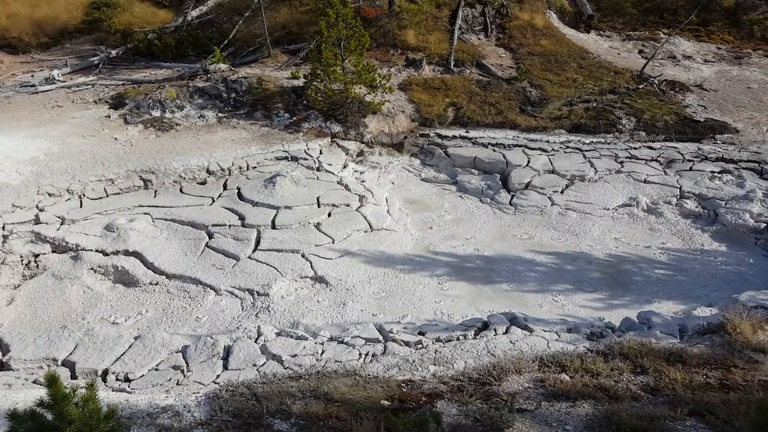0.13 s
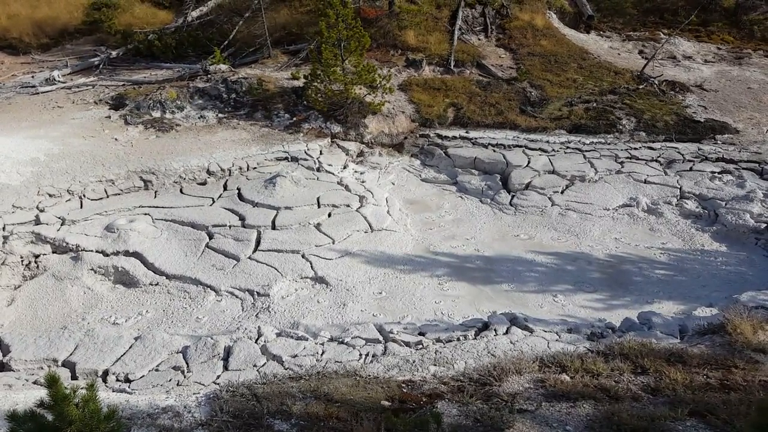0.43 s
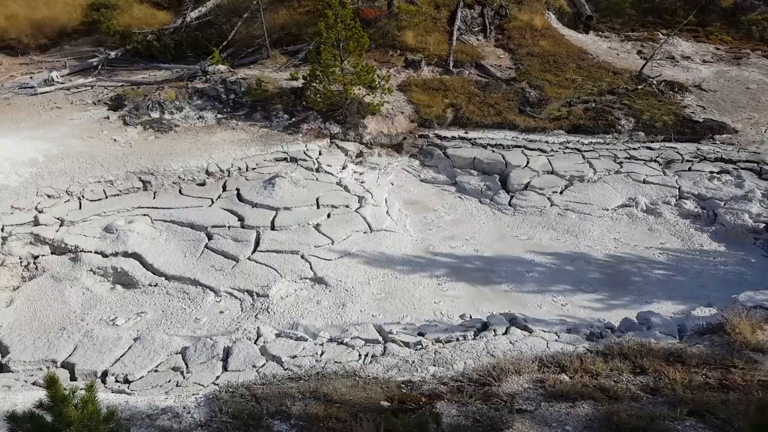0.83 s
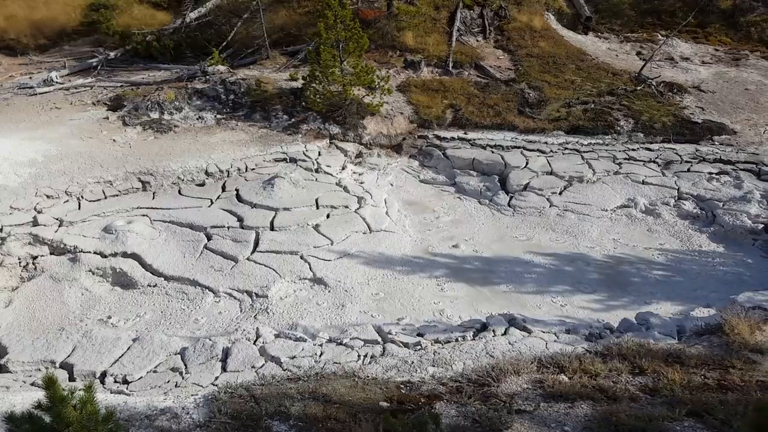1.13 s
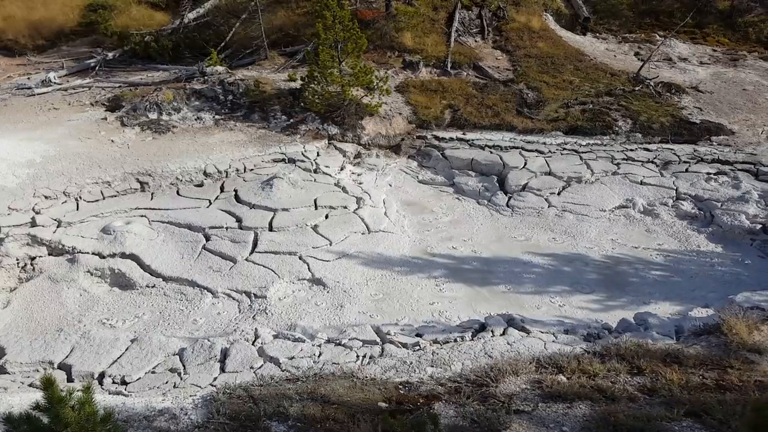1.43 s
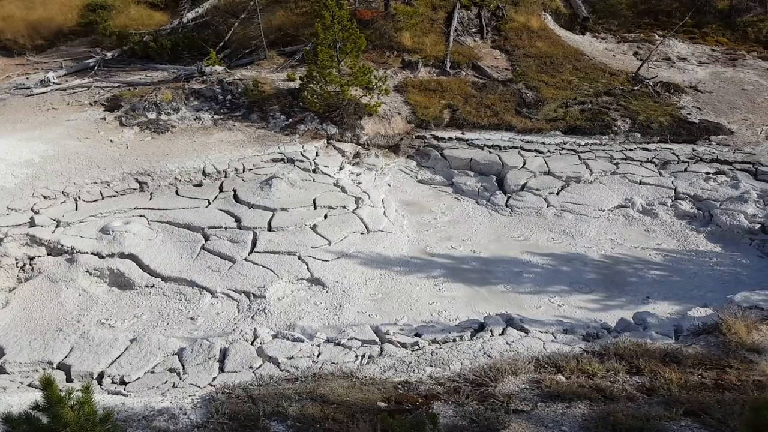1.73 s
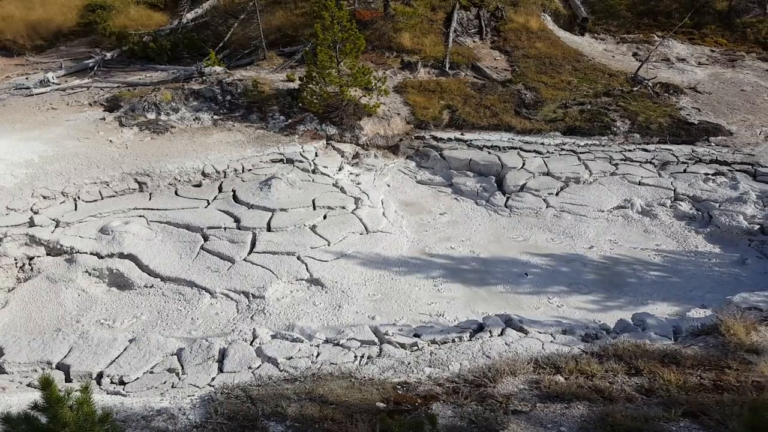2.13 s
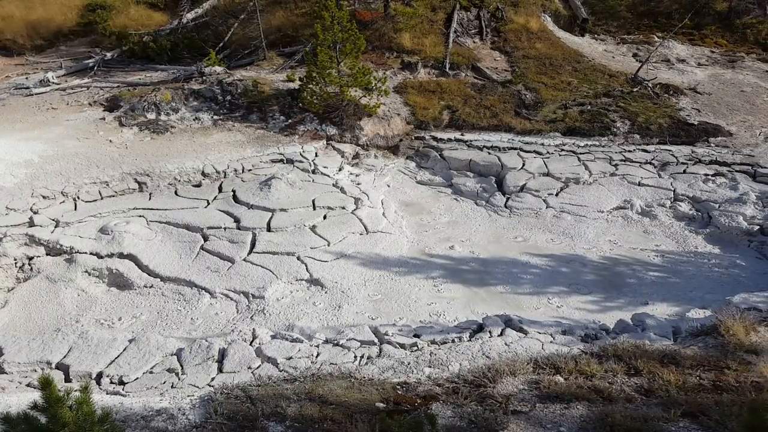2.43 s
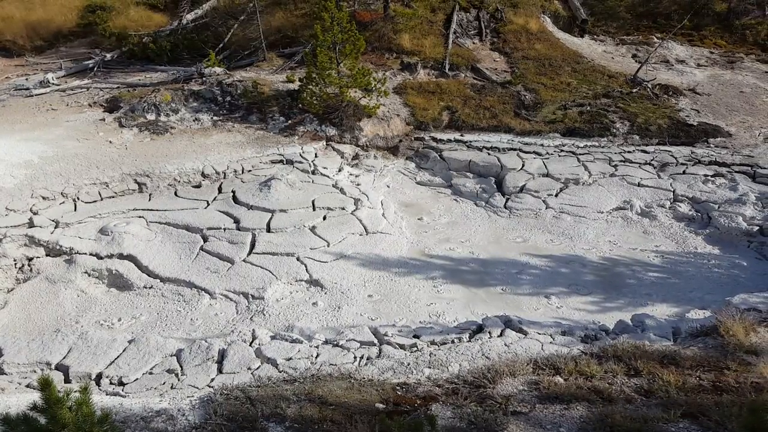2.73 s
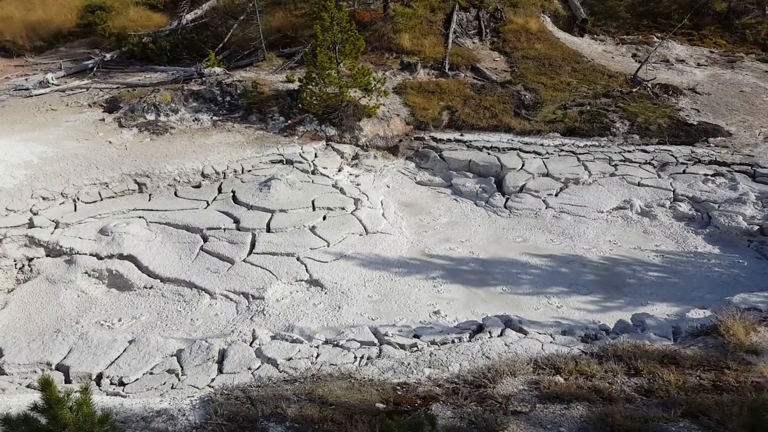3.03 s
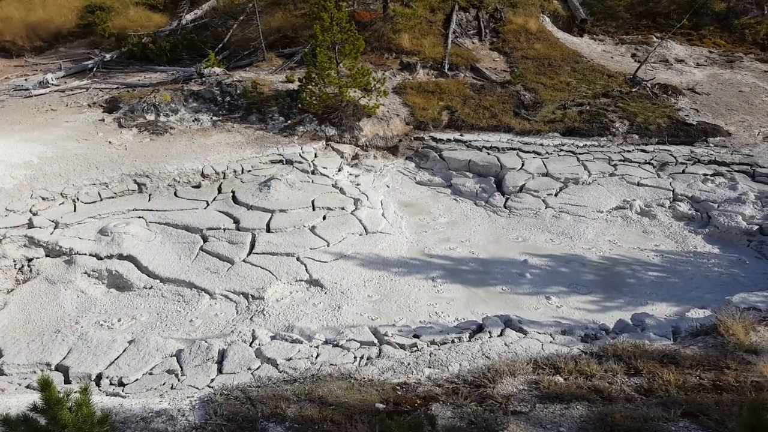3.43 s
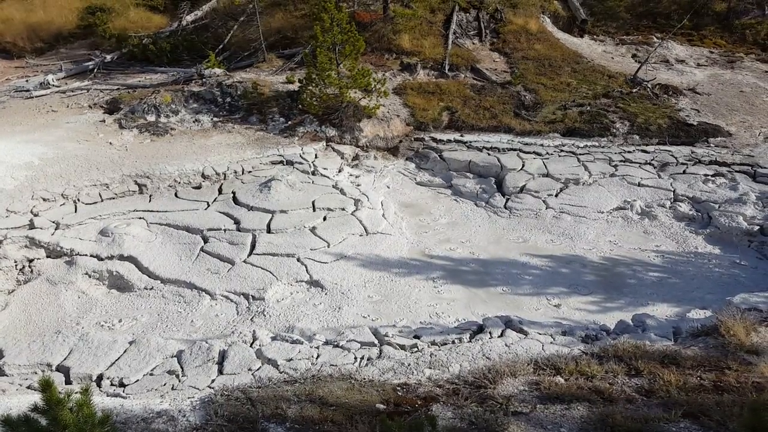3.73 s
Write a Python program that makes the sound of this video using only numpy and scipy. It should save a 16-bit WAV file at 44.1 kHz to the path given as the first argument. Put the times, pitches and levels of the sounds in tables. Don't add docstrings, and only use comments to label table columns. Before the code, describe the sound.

Thick mud bubbles and plops in irregular clusters some metres from a small stereo camera outdoors; gas spits and left-sided wind knocks come early, a sharp wet snap past the middle, soft steam hiss throughout.

```python
import sys
import numpy as np
from scipy import signal
from scipy.fft import rfft, irfft
from scipy.io import wavfile
from scipy.ndimage import uniform_filter1d, map_coordinates

SR = 44100
rng = np.random.default_rng(int(sys.argv[2]) if len(sys.argv) > 2 else 0)


def gain_from_db(level_db):
    decades = np.asarray(level_db, float) / 20
    return 10 ** decades


def digitize_waveform(pressure):
    field = np.atleast_2d(pressure).T
    bounded = np.clip(field, -1, 1)
    quanta = np.round(bounded * 32767).astype(np.int16)
    wavfile.write(sys.argv[1], SR, quanta)


N = 171990
T = np.arange(N) / SR


def level(x, db):
    return x * gain_from_db(db) / np.sqrt(np.mean(x ** 2))


def colour(x, points, rings=()):
    f = np.maximum(np.fft.rfftfreq(4096, 1 / SR), 5)
    hz, db = np.array(points).T
    curve = np.interp(np.log(f), np.log(hz), db)
    for centre, width, gain in rings:
        curve = curve + gain / (1 + ((f - centre) / width) ** 2)
    cepstrum = irfft(curve * np.log(10) / 20)
    cepstrum[1:2048] *= 2
    cepstrum[2049:] = 0
    return signal.fftconvolve(x, irfft(np.exp(rfft(cepstrum))))[:N]


def walk(rate):
    hold = int(SR / rate)
    steps = np.repeat(rng.standard_normal(N // hold + 1), hold)
    return 1.67 * uniform_filter1d(uniform_filter1d(steps, hold), hold)[:N]


def swell(start, length, lean):
    return np.sin(np.pi * np.clip((T - start) / length, 0, 1) ** lean)


# [f/Hz, level/dB]
CIRCUIT_COLOUR = [(100, -23), (5000, -30), (9500, -21), (12000, 13.5), (15500, 14.5)]
CIRCUIT_DB = (-68.5, -77)


def circuit_noise():
    return np.array([level(colour(rng.standard_normal(N), CIRCUIT_COLOUR), db) for db in CIRCUIT_DB])


# [f/Hz, level/dB]
WIND_COLOUR = [(20, -10), (40, -2), (62, 1.5), (110, -7), (200, -26), (400, -48)]
# [t/s, level/dB]
WIND_COURSE = [(0, -48), (.9, -57), (1.5, -63), (2.2, -61.5), (2.9, -65), (3.4, -59), (3.9, -65)]
# [t/s, length/s, level/dB, f/Hz]
WIND_KNOCKS = [
    (.0, 0.08, -37, 77),
    (0.053, 0.048, -28.5, 61),
    (0.136, 0.041, -33, 87.5),
    (0.317, 0.065, -42, 51),
    (0.593, 0.028, -33, 57),
    (0.66, 0.093, -41, 80.6),
    (0.784, 0.032, -35.5, 83.6),
    (1.353, 0.078, -27, 72),
    (1.757, 0.032, -38, 86),
    (3.47, .07, -45.5, 68.4),
]


def wind():
    course_db = np.interp(T, *np.array(WIND_COURSE).T)
    rumble = []
    for port_db in (0, -4.5):
        noise = level(colour(rng.standard_normal(N), WIND_COLOUR), port_db)
        rumble.append(noise * gain_from_db(course_db + 0.73 * walk(17)))
    knocks = np.zeros(N)
    for s, length, db, hz in WIND_KNOCKS:
        wobbly = np.sin(2 * np.pi * hz * (T - s) + walk(70))
        knocks += gain_from_db(db) * swell(s, length, 0.9) * wobbly
    return np.array(rumble) + knocks * gain_from_db(np.array([[0], [-17]]))


# [t/s, level/dB, left minus right level/dB]
NEAR_TICKS = [
    (0.2991, -50, 13),
    (1.5293, -52, 12),
    (1.7703, -48, 15),
    (2.4803, -43, 6.0),
]


def ticks():
    out = np.zeros((2, N))
    age = np.arange(200)
    for s, db, pan in NEAR_TICKS:
        click = np.diff(rng.standard_normal(200) * np.exp(-age / 22), prepend=0)
        i = int(s * SR)
        out[:, i:i + 200] += click * gain_from_db(db - 6 + np.array([[pan], [-pan]]) / 2)
    return out


def tap():
    fade_s, ring_hz = 0.0004, 15300
    age = np.maximum(T - 3.5839, 0)
    dent = np.exp(-age / fade_s) * (1 - np.exp(-(age / 0.00012) ** 2))
    rebound = 0.2 * np.sin(np.minimum(age / 0.005, 1) * np.pi)
    ring = 0.75 * age / fade_s * np.exp(-2 * age / fade_s) * np.sin(2 * np.pi * ring_hz * age)
    return -gain_from_db(-16) * (dent - rebound + ring) * np.array([[0], [1]])


# [f/Hz, level/dB]
STEAM_COLOUR = [(40, -7.5), (120, 8.5), (400, 10.5), (800, 3), (1500, -0.5), (3000, -11), (5000, -11.5),
                (9000, -27.5)]
# [f/Hz, level/dB]
SCATTER_COLOUR = [(150, 4.5), (600, -12), (1500, 1.5), (3000, 9.5), (10000, 8)]


def steam():
    hiss = []
    for _ in range(3):
        flicker_db = 1.12 * walk(24.863) + 0.097 * walk(2.26)
        hiss.append(colour(rng.standard_normal(N) * gain_from_db(flicker_db), STEAM_COLOUR))
    gain = gain_from_db(-52) / np.std(hiss[0])
    scattered = [gain * gain_from_db(-1.5) * colour(h, SCATTER_COLOUR) for h in hiss[1:]]
    return gain * hiss[0], scattered


# [t/s, length/s, bubble level/dB, middle f/Hz, gas level/dB]
MUD_CHURNS = [(0.077, 0.046, -39.5, 568, -42.5), (0.431, 0.087, -44.5, 310, -52),
              (0.533, 0.036, -47, 320, -52), (0.612, 0.061, -38.5, 331, -41.5),
              (0.921, 0.072, -45, 325, -50.5), (1.124, 0.051, -46.5, 402, -44),
              (1.31, 0.058, -47, 305, -60), (1.359, 0.062, -51, 286, -47.5), (1.495, 0.1, -43.5, 425, -58),
              (1.68, 0.058, -39.5, 332, -46), (1.734, 0.079, -40, 298, -47.5),
              (1.8, 0.048, -49.5, 300, -53), (0.874, .06, -45.5, 250, -57.5),
              (3.265, 0.039, -50.5, 330, -66), (2.131, 0.1, -41, 364, -46), (2.32, 0.048, -38, 574, -41),
              (2.473, 0.077, -50, 350, -56), (2.653, 0.039, -44, 402, -57), (2.729, 0.06, -46.5, 338, -53),
              (3.102, 0.1, -41, 284, -44), (3.206, 0.069, -43, 394, -46.5), (3.317, 0.16, -51, 312, -73),
              (3.586, 0.11, -41.5, 398, -48.5), (3.686, 0.099, -43, 236, -52)]
# [t/s, peak level/dB, rise/s]
GAS_SPITS = [
    (0.012, -23.5, 0.0021),
    (0.29, -22, 0.0017),
    (.832, -30, 0.0025),
    (1.768, -32.5, 0.0026),
    (1.554, -23.5, 0.0032),
    (2.36, -29.5, 0.0022),
    (3.645, -25.5, 0.0044),
    (2.661, -30, 0.0029),
]
# [f/Hz, level/dB]
GAS_COLOUR = [(100, 16), (400, 6.5), (800, 4), (1400, -0.5), (2500, -6), (4500, -10), (8000, -29.5),
              (16000, -41)]


def gas():
    puffs = np.zeros(N)
    for s, length, _, _, gas_db in MUD_CHURNS:
        puffs += gain_from_db(gas_db) * swell(s, 1.187 * length, 0.95)
    puffs *= gain_from_db(4.5 * walk(300))
    spits = np.zeros(N)
    for s, db, rise in GAS_SPITS:
        age = np.maximum(T - s, 0) / max(rise, 0.0005)
        spits += gain_from_db(db - 9) * age * np.exp(1 - age)
    return (puffs + spits) * level(colour(rng.standard_normal(N), GAS_COLOUR), 0)


def add_bubble(out, s, db, hz, cycles):
    hook, hook_cycles, top = 0.5, 1.52, 1.141
    u = np.arange(int(7 * cycles / hz * SR)) * hz / SR
    i = max(int(s * SR), 0)
    turns = top * u - hook * hook_cycles * (1 - np.exp(-u / hook_cycles))
    envelope = gain_from_db(db) * u / cycles * np.exp(1 - u / cycles)
    ring = envelope * np.sin(2 * np.pi * turns)
    out[i:i + len(u)] -= ring[:max(N - i, 0)]


def add_churn(out, s, length, db, hz, gas_db):
    n = min(int(380 * length), 60)
    for k, (jitter, pitch, size, spray) in enumerate(rng.random((n, 4))):
        when = (k + jitter) / n
        size_db = -3 * np.log(size + 0.062) - 1 - 9 * (2 * when - 1) ** 2
        octaves = 1.717 * (pitch - 0.5)
        add_bubble(out, s + when * length, db + size_db, hz * 2 ** octaves, 0.85 * (1 + pitch))
        spray_db = gas_db + size_db - 5 - 10 * spray
        add_bubble(out, s + when ** 0.5 * length, spray_db, 561 * 2 ** (2 * spray), 2.5)


# [t/s, peak level/dB, f/Hz, cycles]
LONE_BUBBLES = [(0.052, -33.5, 311.0, 1.87), (0.0617, -24.5, 240, 0.66), (0.5283, -29.5, 340, 1.24),
                (0.543, -33.2, 374, 1), (0.5811, -27, 203, 0.93), (0.619, -26, 392, 1.3),
                (0.6294, -36.5, 227.0, 1.5), (0.655, -33, 413, 1.1), (0.8692, -30, 522.0, 0.97),
                (0.9539, -30, 424.0, 0.78), (0.968, -35.5, 308, 0.9), (1.1134, -23, 332, 1),
                (1.1363, -31, 415, 1.5), (1.1507, -35, 524, 3.4), (1.3352, -33, 336, 2.0),
                (1.559, -29, 518, 1.06), (1.6634, -23, 343, 0.9), (1.6735, -25, 278, 0.55),
                (1.6985, -35.5, 522.0, 3), (1.7052, -34, 224, 1.2), (1.737, -35, 226, 2.4),
                (1.7528, -36, 433, 1.6), (1.7694, -35, 280.0, 0.7), (1.7823, -35, 343, 2.9),
                (2.1533, -35.6, 380, 2.0), (2.1768, -30, 348, 0.94), (2.267, -26.5, 205.0, 0.7),
                (2.3083, -33.5, 185.0, 3), (2.3193, -32.5, 248.5, 3), (2.3284, -30, 585, 0.54),
                (2.3391, -29.5, 724, 0.39), (2.6531, -31, 380.5, 1.9), (2.6644, -33.5, 388, 2.2),
                (2.7275, -34, 332, 1.76), (3.1203, -37, 311.0, 3.7), (3.1289, -30.3, 250, 1.17),
                (3.1442, -35, 229, 1.5), (3.2047, -27.5, 380, 0.74), (3.2155, -28, 349, 1.23),
                (3.2357, -30, 536, 0.59), (3.5786, -32.5, 306, 2.0), (3.6012, -30.5, 477, 1.7),
                (3.6301, -34, 382.0, 0.7), (3.6408, -35.5, 382.0, 2.6), (3.6513, -36, 514, 1.5),
                (3.6688, -29, 208, 0.9), (3.7063, -29, 191, 1.1), (3.7128, -36.4, 356, 1.7),
                (3.7559, -32, 256, 0.99),
                (.13, -41, 640, 3.8), (0.299, -35.5, 430, 1.4), (0.438, -34.5, 256, 0.81),
                 (0.72, -41.5, 1030, 2.1), (.815, -35.5, 740, 1.46), (1.998, -37, 397, 1.05),
                 (2.448, -35.5, 191, 0.65), (2.773, -45.5, 820, 5.6), (3.098, -35, 253, 0.82),
                 (3.381, -40, 195, 0.6), (3.721, -32, 220, 0.59), (1.789, -33, 227, .8),
                 (1.671, -47, 2230, 5), (1.725, -52, 1980, 4), (1.749, -48, 1970, 4)]
# [t/s, peak level/dB, f/Hz, cycles]
SKIN_SNAP = (2.3320, -17.5, 680, .42)
# [t/s, peak level/dB, f/Hz]
THROWN_DROPS = [(0.0072, -43.4, 935), (0.012, -41.5, 1500), (0.1017, -45, 980), (0.1068, -47, 919.0),
                (0.2908, -40.5, 2995), (0.9538, -38.5, 926), (0.9598, -47, 823), (0.9673, -42.5, 823),
                (1.5483, -42.5, 796), (1.5518, -48, 1020), (1.5569, -37.5, 2220), (1.5613, -39.5, 1255),
                (1.6995, -44, 1530), (1.758, -42, 930), (1.765, -44, 780), (1.77, -46, 1170),
                (1.778, -39, 813), (1.7901, -46, 1160), (2.027, -43, 1380), (2.1659, -40, 900),
                (2.1884, -42.5, 1144), (2.196, -41, 857.0), (2.3232, -40, 1040), (2.3433, -39, 895),
                (2.3521, -46, 810), (3.1312, -41, 883), (3.1411, -41, 1056.0), (3.151, -47, 1190),
                (3.158, -41, 1310), (3.163, -43, 1230), (3.169, -40, 1213.0), (3.1773, -39, 919.0),
                (3.185, -52, 1200), (3.2426, -39, 3400), (3.251, -39, 786), (3.6268, -43.5, 2190),
                (3.642, -46.5, 1220), (3.6477, -40, 2280), (3.655, -39, 1700), (3.661, -44.9, 1100)]


def bubbles():
    out = np.zeros(N)
    for row in LONE_BUBBLES + [SKIN_SNAP]:
        add_bubble(out, *row)
    for drop in THROWN_DROPS:
        add_bubble(out, *drop, 2.7)
    for churn in MUD_CHURNS:
        add_churn(out, *churn)
    for when, pitch, size in rng.random((700, 3)):
        db = -57.5 - 12 * pitch - 7.5 * np.log(size + 0.044)
        add_bubble(out, when * N / SR, db, 110 * 2 ** (3.33 * pitch), 0.8)
    return out


def bank_echo(mud):
    age = np.arange(4000) / SR
    tail = rng.standard_normal(len(age)) * np.exp(-age / 0.0096) * (age > 0.003)
    bright = np.diff(mud, prepend=0) * 6
    return signal.fftconvolve(bright, tail / np.linalg.norm(tail))[:N] * gain_from_db(-14.5)


# [f/Hz, level/dB]
LEFT_COLOUR = [(100, -4.5), (350, -3.5), (520, -8.5), (750, 1.5), (1400, -2), (2500, -3.5), (5000, -9),
               (10000, -7.5)]
RIGHT_COLOUR = [(150, -5), (1000, -2.5), (3000, 1.5), (5000, -3), (7000, -6.5), (10000, -7.5)]
# [f/Hz, width/Hz, level/dB]
LEFT_HUMPS = [(8540, 960, 16), (1275, 850, -6)]
RIGHT_HUMPS = [(2150, 446, 15.5), (5710, 234, 8), (1260, 103, 6)]
# [f/Hz, width/Hz, level/dB]
HOUSING_DIPS = [(6770, 270, -4), (4880, 280, -4)]


def scene():
    mud = signal.sosfilt(signal.butter(2, 75, "high", fs=SR, output="sos"), bubbles() + gas())
    hiss, scattered = steam()
    ports = [(LEFT_COLOUR, LEFT_HUMPS, 0), (RIGHT_COLOUR, RIGHT_HUMPS, 0.00027)]
    out = []
    for (points, humps, lag), around in zip(ports, scattered):
        direct = map_coordinates(mud + hiss, [(T - lag) * SR], mode="nearest")
        out.append(colour(direct + bank_echo(mud) + around, points, humps + HOUSING_DIPS))
    return np.array(out) + wind() + ticks() + tap()


def top_cut(x):
    return signal.sosfilt(signal.butter(12, 16660, fs=SR, output="sos"), x)


def record(dry):
    low_pass = signal.ellip(12, 0.3, 80, 15750, fs=SR, output="sos")
    high_pass = signal.butter(3, 32, "high", fs=SR, output="sos")
    cut = signal.sosfilt(low_pass, dry + circuit_noise())
    mix = signal.sosfilt(high_pass, cut) - 0.0006
    return top_cut(mix)


dry = scene()
out = record(dry)
digitize_waveform(out)
```